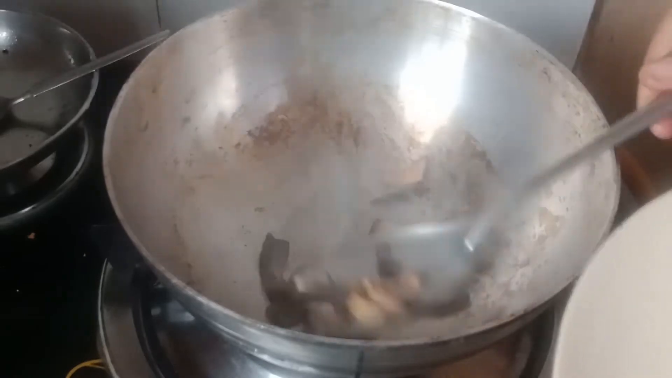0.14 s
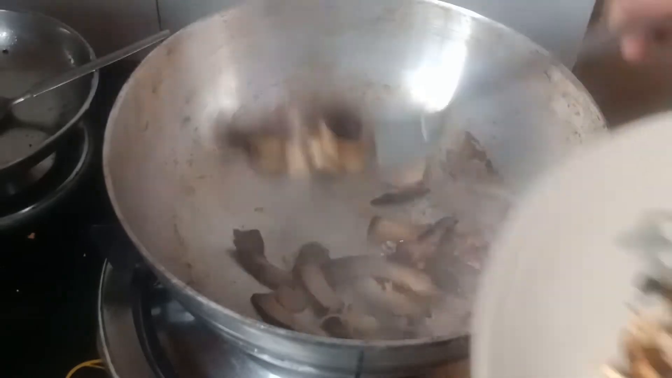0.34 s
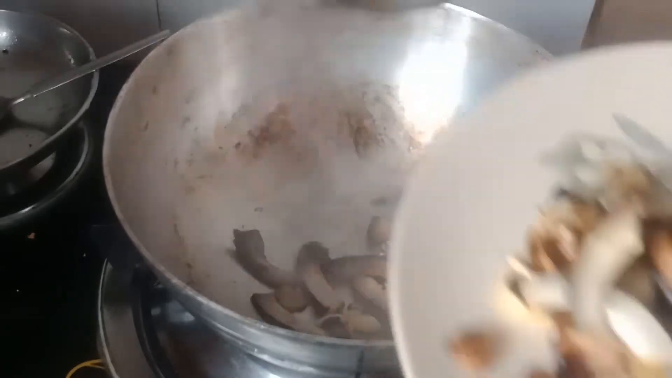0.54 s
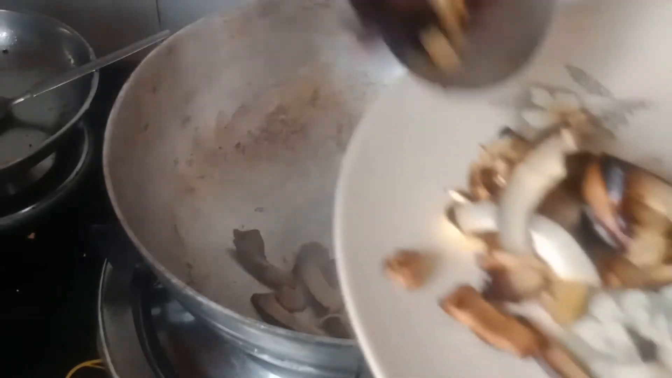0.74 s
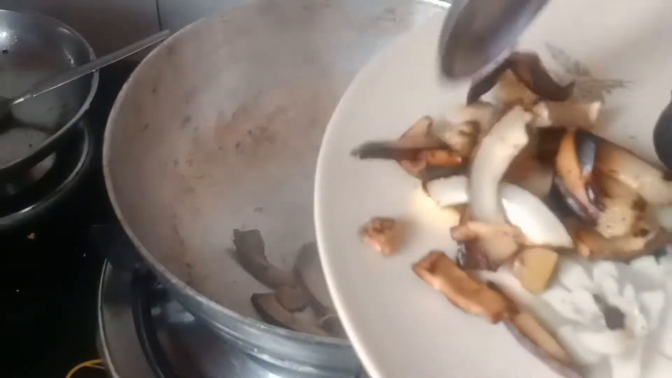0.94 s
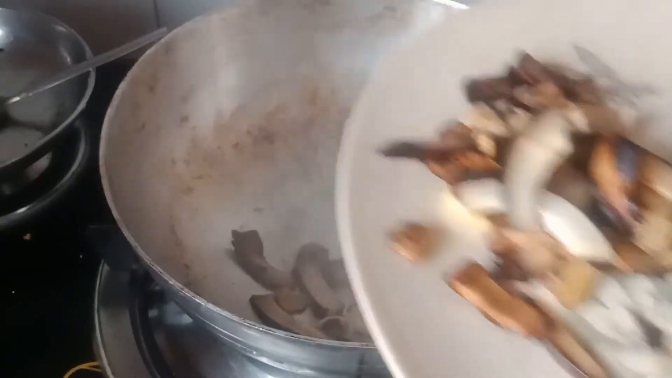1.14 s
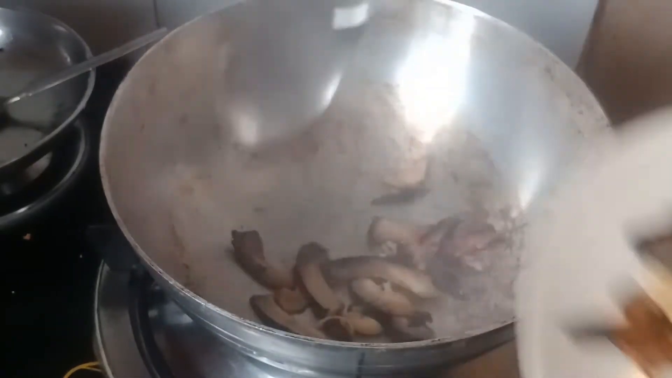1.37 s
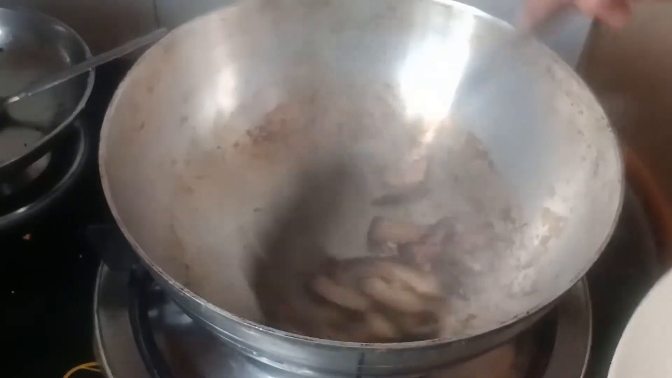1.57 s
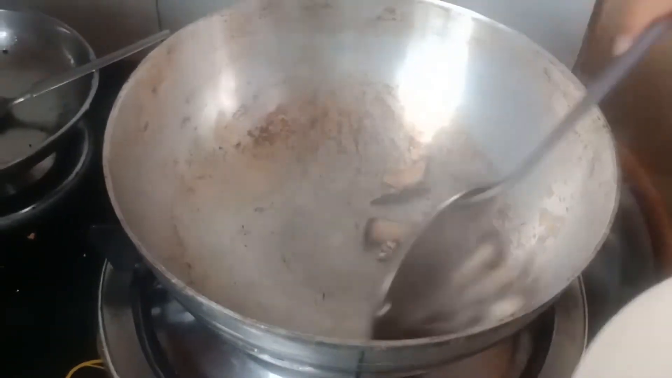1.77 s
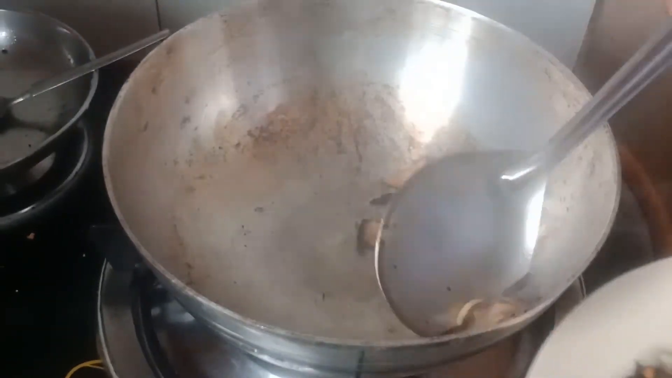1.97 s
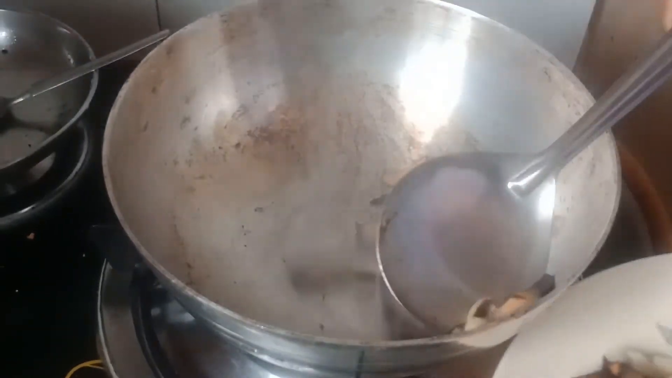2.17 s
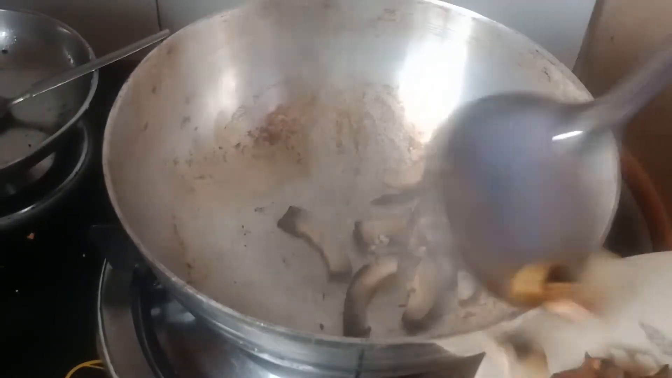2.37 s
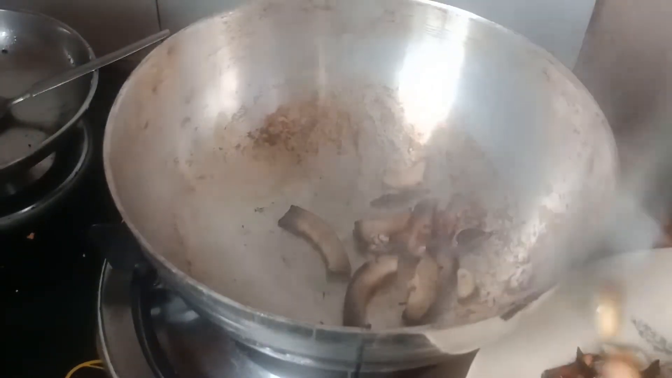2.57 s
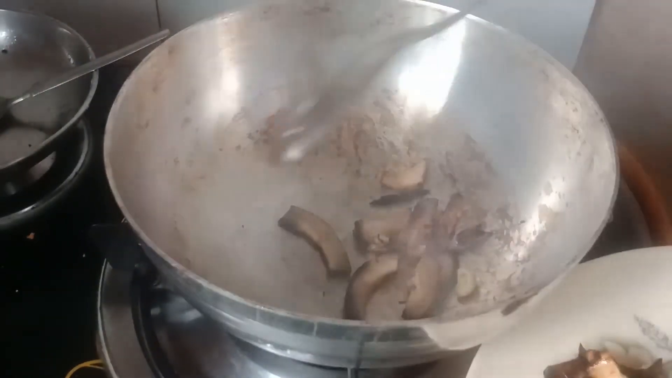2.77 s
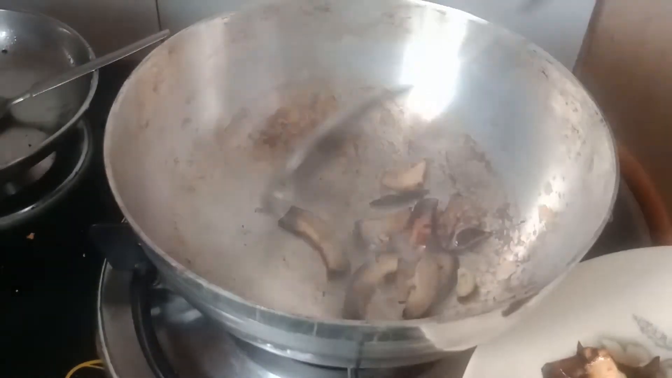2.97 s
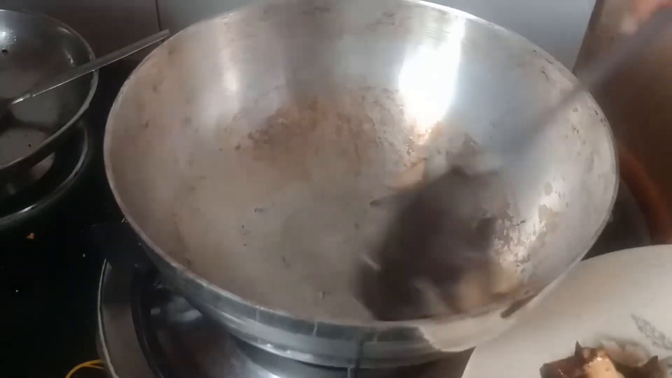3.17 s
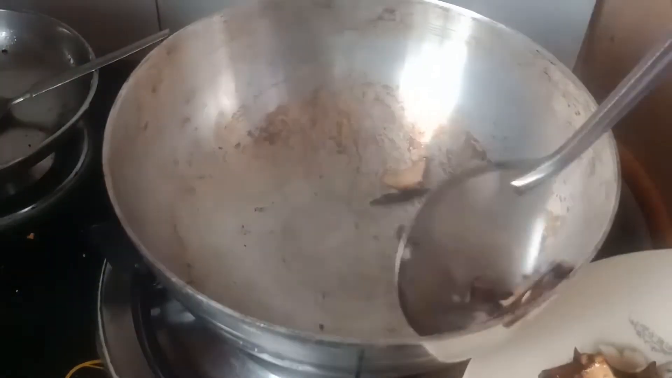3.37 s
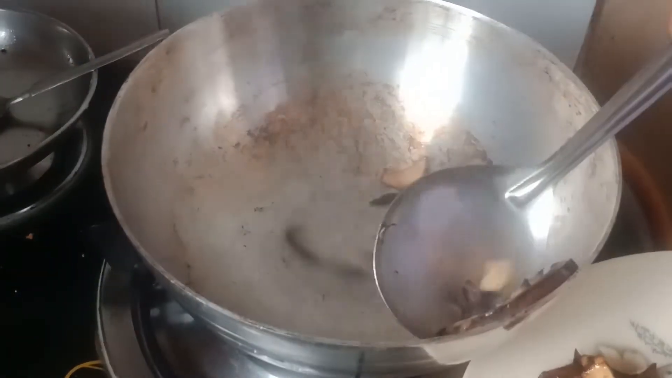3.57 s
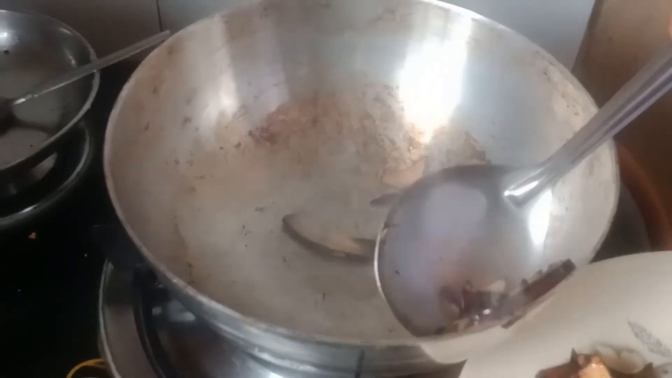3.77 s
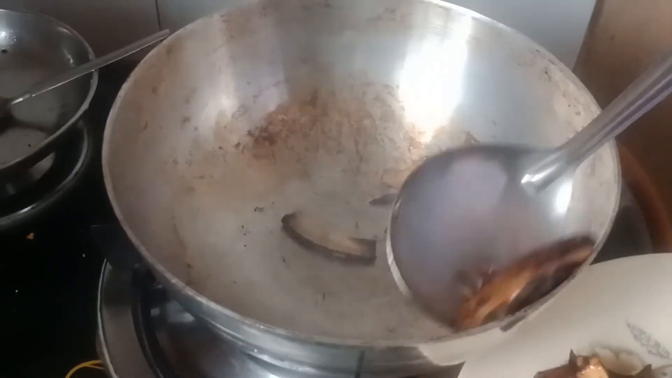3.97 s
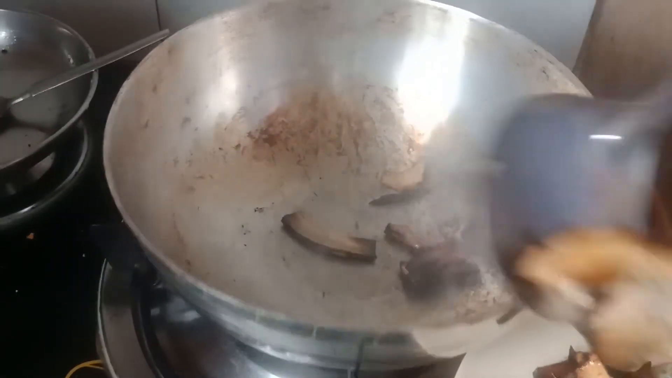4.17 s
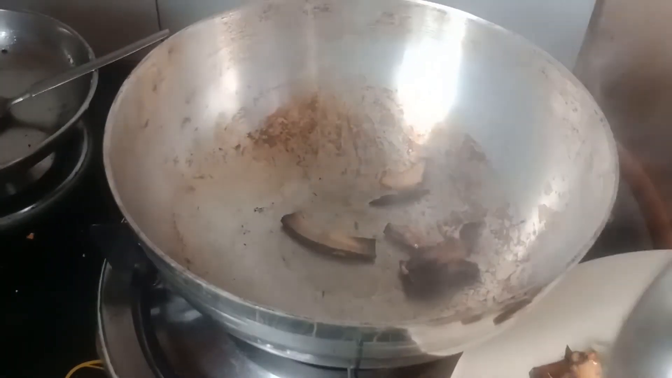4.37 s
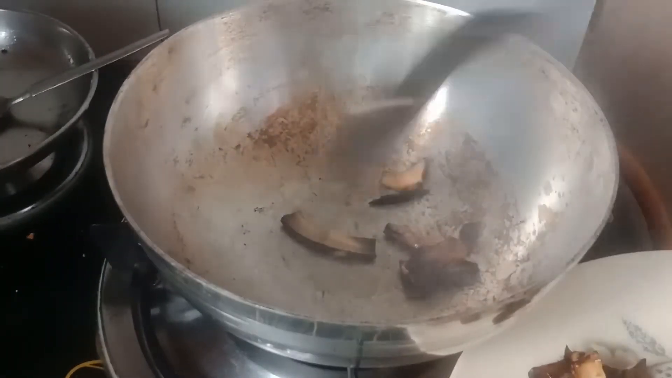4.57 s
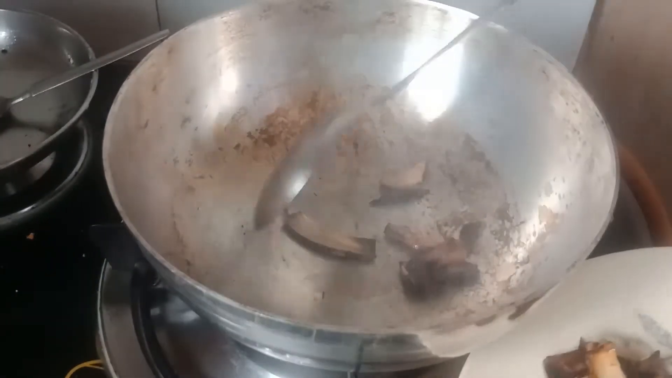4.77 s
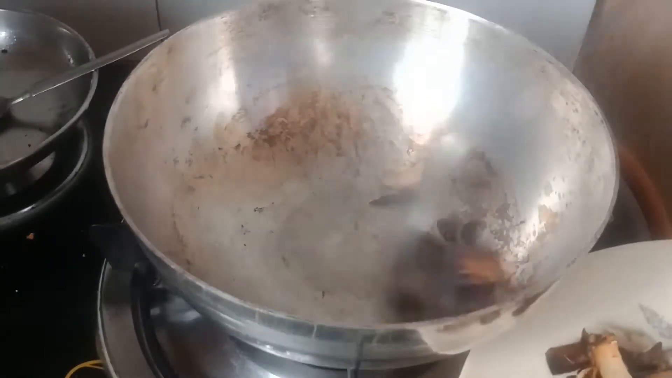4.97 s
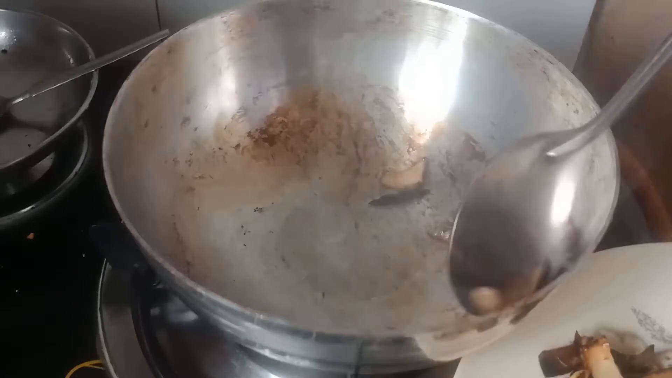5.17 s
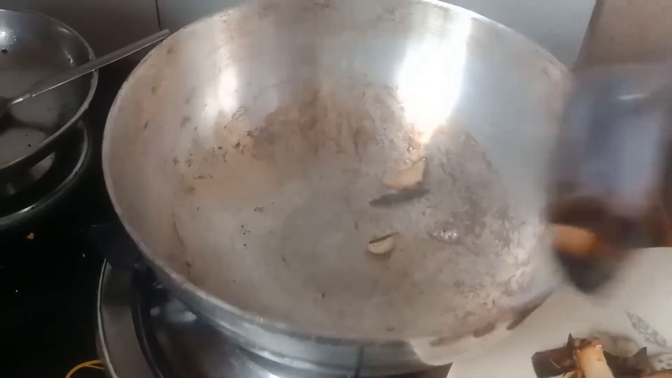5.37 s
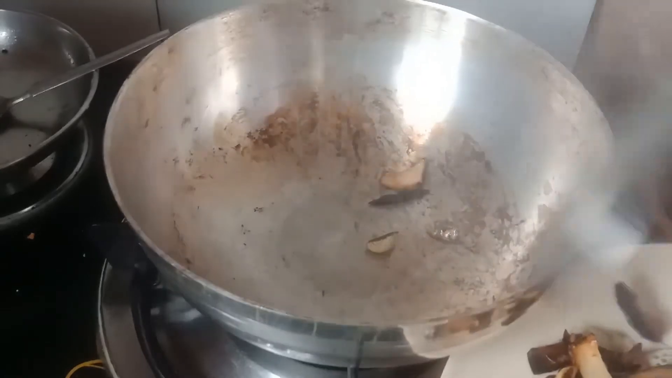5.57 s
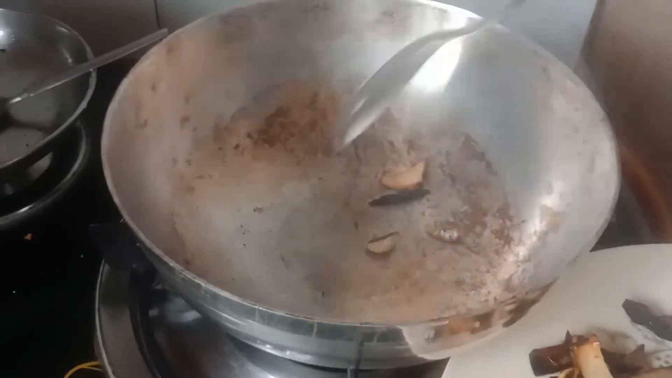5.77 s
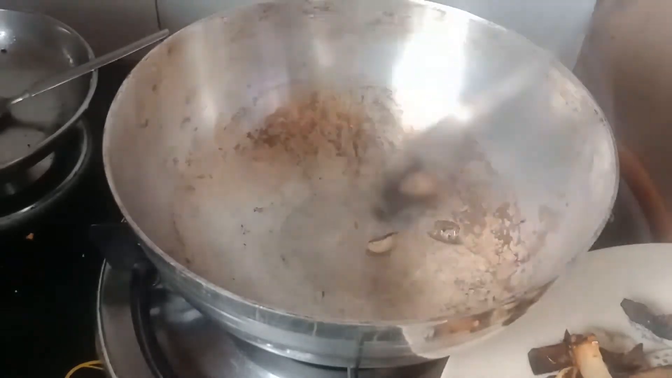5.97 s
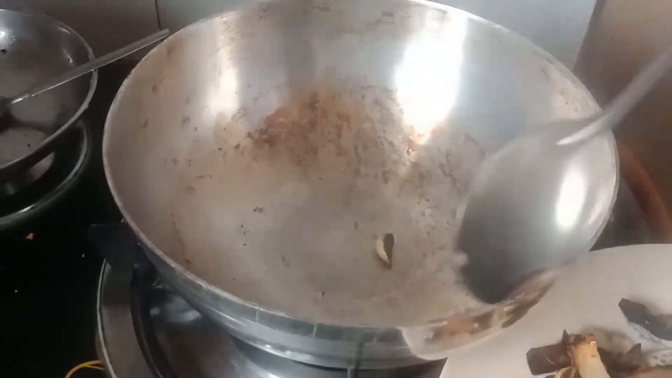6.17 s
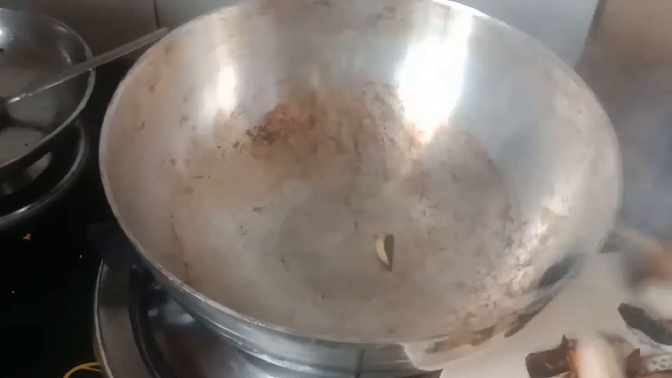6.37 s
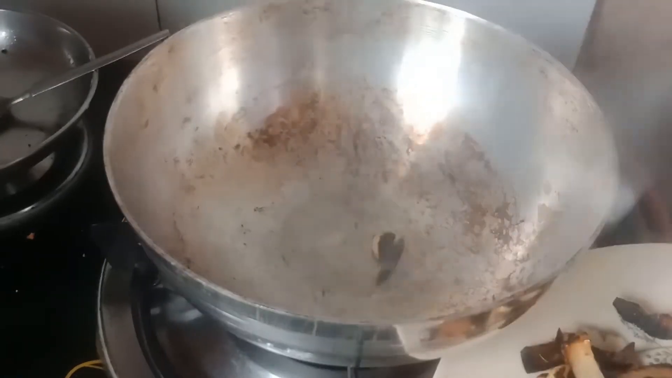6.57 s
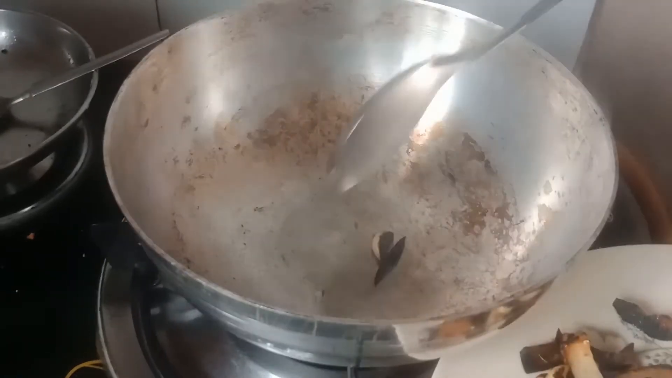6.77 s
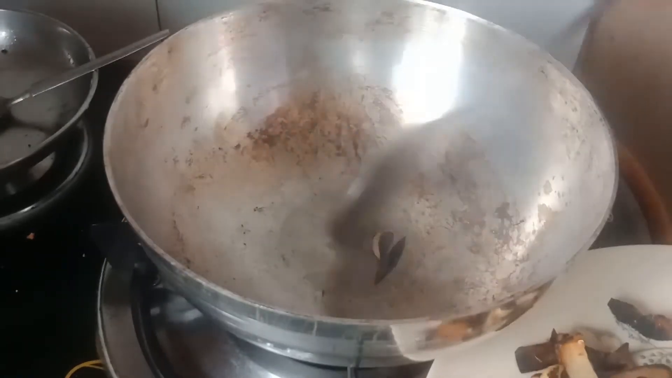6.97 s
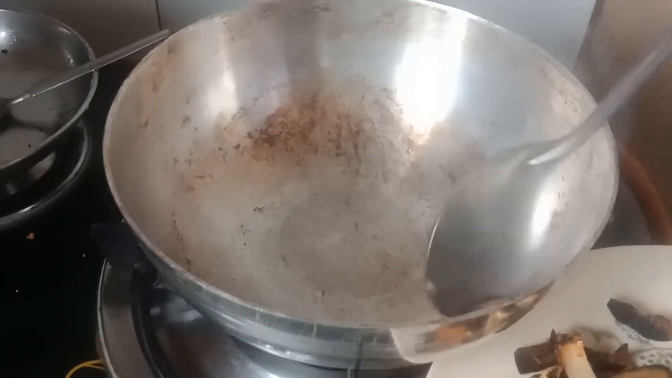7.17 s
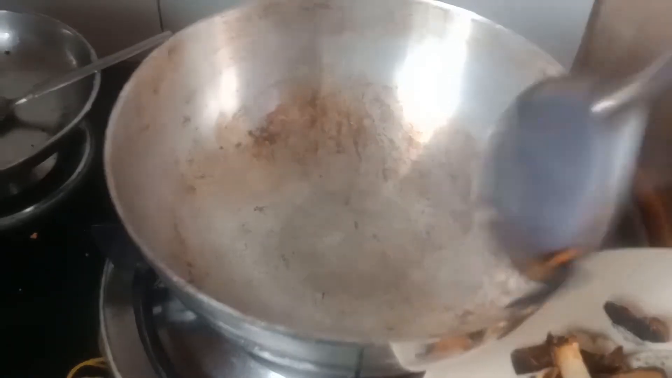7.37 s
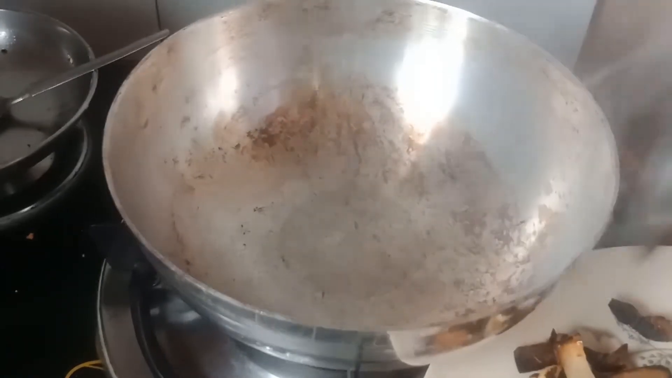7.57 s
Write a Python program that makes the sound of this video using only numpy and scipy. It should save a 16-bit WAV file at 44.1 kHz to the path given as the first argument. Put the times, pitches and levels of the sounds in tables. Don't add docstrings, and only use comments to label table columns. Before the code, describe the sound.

Close up in a small quiet kitchen, a steel spatula scrapes a thin round-bottomed pan. After a faint start and a near-quiet second come a short scrape, then longer, louder strokes, each landing with a sharp clank and bright ping and juddering up the wall with a rising rasp. Between strokes are knocks on rim and plate and dull pan thumps. A low appliance hum lies behind, with a short dull room echo.

```python
import sys
import numpy as np
from scipy import signal
from scipy.fft import rfft, irfft, next_fast_len
from scipy.io import wavfile
from scipy.ndimage import uniform_filter1d

SR = 44100
rng = np.random.default_rng(int(sys.argv[2]) if len(sys.argv) > 2 else 0)


def level_to_linear(level):
    exponent = np.asarray(level, float) / 20
    return 10 ** exponent


def persist_wave(psi):
    counts = np.round(np.clip(psi, -1, 1) * 32767).astype(np.int16)
    wavfile.write(sys.argv[1], SR, np.atleast_2d(counts).T)


N = 336914
SIDES = np.array([[1], [-1]])


def rms_one(x):
    return x / np.sqrt(np.mean(x ** 2) + 1e-20)


def at_hz(points, hz):
    pitch, level = np.array(points)[:, 0], np.array(points)[:, 1]
    return np.interp(np.log(np.maximum(hz, 1)), np.log(pitch), level)


def drift(rate):
    r = np.exp(-80 * np.pi * rate / SR)
    noise = rng.standard_normal(N // 40 + 2002)
    slow = signal.lfilter([1], [1, -2 * r, r * r], noise)[2000:]
    return np.interp(np.arange(N) / 40, np.arange(len(slow)), rms_one(slow))


# (pitch [Hz], level per Hz [dB])
HUM = [(12, -38.5), (20, -8.5), (27, -30), (59, -15), (101, -1), (308, -12.5), (335, -7), (510, -15.5),
       (693, -10), (1250, -17.5), (1950, -19), (2650, -19), (3800, -22), (7030, -33.5), (15800, -36.5)]
# (pitch [Hz], side minus middle [dB])
HUM_SIDE = [(60, -14), (200, -8.5), (700, -4), (1500, -1), (15000, 0.5)]


def hum():
    size = next_fast_len(N)
    hz = np.arange(size // 2 + 1) * SR / size
    width = np.array([np.ones(len(hz)), level_to_linear(at_hz(HUM_SIDE, hz))])
    noise = rfft(rng.standard_normal((2, size)))
    mid, side = irfft(noise * level_to_linear(at_hz(HUM, hz)) * width, size)[:, :N]
    level = level_to_linear(-62) * level_to_linear(.8 * drift(3)) / np.std(mid)
    return level * np.array([mid + side, mid - side])


def kitchen(x):
    t60_s, level_db, cut_hz = 0.25, -10.5, 8200
    t = np.arange(SR // 2) / SR
    noise = rng.standard_normal((2, len(t)))
    bass = signal.butter(2, 500, fs=SR, output="sos")
    common = signal.sosfilt(bass, noise[0] - noise[1])
    tail = np.array([noise[0], noise[1] + common]) * level_to_linear(-60 * t / t60_s) * (t > .004)
    tail = signal.sosfilt(signal.butter(1, cut_hz, fs=SR, output="sos"), tail)
    tail = tail / np.sqrt(np.sum(tail ** 2) / 2)
    return level_to_linear(level_db) * signal.oaconvolve(x, tail, axes=1)[:, :N]


# (pitch [Hz], left minus right [dB])
LEAN = [(200, -2), (600, 2.5), (2000, 0), (5000, -2), (12000, -16)]
# (pitch [Hz], phase [rad])
PHASE_SPREAD = [(200, 0.15), (600, 0.29), (1500, 2.19), (5000, 1.94)]


def left_right(hz, chance, share):
    phase = share * SIDES * at_hz(PHASE_SPREAD, hz) * chance
    return level_to_linear(SIDES * at_hz(LEAN, hz) / 2) * np.exp(1j * phase)


def part(modes, band_hz):
    hz, width, db = np.transpose(modes)
    t = np.arange(SR // 8) / SR
    rings = np.exp(np.outer(2j * np.pi * hz - np.pi * np.abs(width), t))
    rings = rings * (1 - np.exp(-np.outer(hz, t) / 0.39))
    edges = np.clip(band_hz, 20, .45 * SR)
    radiates = signal.butter(3, edges, "band", fs=SR, output="sos")
    rings = signal.sosfilt(radiates, rings).astype(np.complex64)

    def touch(lead_hz, spot_db):
        chance = rng.standard_normal((3, len(hz)))
        lead_db = 7.0 * np.exp(-(np.log(hz / max(lead_hz, 1)) / 0.19) ** 2)
        level = level_to_linear(db + lead_db + spot_db * chance[0])
        strength = np.sqrt(np.abs(width)) * level * np.sign(chance[1])
        ways = left_right(hz, chance[2], share=.5)
        pair = ((strength * ways).astype(np.complex64) @ rings).imag
        return pair / np.sqrt(np.sum(pair ** 2) / 2)
    return touch


# (pitch [Hz], level per Hz [dB])
SHEET = [(88, -49), (150, -9.5), (290, -19), (948, -13.5), (1240, -16.5), (1600, -14.5), (3160, -10.5),
         (3910, -27), (5030, -24.5), (15500, -47)]


def crowd(low_hz, high_hz, width_hz, level_db, count):
    hz = low_hz * (high_hz / low_hz) ** rng.random(count)
    db = at_hz(SHEET, hz) + 10 * np.log10(hz)
    return list(zip(hz, np.full(count, width_hz), db - db.max() + level_db))


# (pitch [Hz], width [Hz], level [dB])
BOWL = [(45, 44, -43), (93, 23, -13.5), (189.3, 11, -8.5), (242.8, 11, -2.5), (286.4, 6.5, 0.5),
        (380, 21.7, 2.5), (455, 20, 4.5)]
WALL = [(562.4, 54, 9.5), (609.4, 13, -9), (650, 20, 1.5), (754.4, 34, -2), (875.7, 39, 0), (950, 91, 4.5),
        (1010, 160, -7.5)]
RIM = [(1320, 87, 8), (1453, 51, 1.5), (1599, 84, 7.5), (1720, 44, -9.5), (1869, 10, -2.5), (2057, 60, 6),
       (2228, 8.1, -5.5), (2437, 29, 0.5), (2600, 54, -42.5), (2752, 180, 10)]
BLADE = [(3025, 130, 6.5), (3090, 52, 1), (3171, 41, 9.5), (3350, 22, -37.5), (3330, 12, -25)]
EDGE = [(4920, 42, 0.5), (5680, 34, -6), (6403, 48, -5.5), (6824, 71, -6.5), (7910, 28, -14.5),
        (8460, 91, -16), (8970, 44, -27.5), (9500, 64, -20.5), (9770, 50, -19.5), (10300, 56, -22),
        (11500, 45, -29), (12300, 45, -29.5), (12600, 120, -28), (14700, 40, -28), (13700, 45, -30),
        (14410, 150, -29), (14900, 57, -24)]
# (lowest [Hz], highest [Hz])
PART_BANDS = [(75, 810), (485, 1540), (1354, 2590), (3510, 5510), (2670, 3490), (4470, 24000)]


def parts():
    bowl = BOWL + crowd(160, 500, 26, -26.0, count=6)
    wall = WALL + crowd(504.0, 1243.0, 45, -3.5, count=30)
    rim = RIM + crowd(1202, 3185, 96, -2.1, count=60)
    crust = crowd(3194, 4800, 120, 0, count=30)
    blade = BLADE + crowd(2750, 3500, 38, -1.5, count=16)
    edge = EDGE + crowd(4756, 7434, 120, -11.5, count=45)
    edge = edge + crowd(7600, 11000, 25, -27.5, count=16) + crowd(11000, 15000, 60, -36, count=26)
    return [part(m, band) for m, band in zip([bowl, wall, rim, crust, blade, edge], PART_BANDS)]


# (pitch [Hz], width [Hz], level [dB])
SNAP = [(1520, 720, 15.5), (2296, 310, 1), (3104, 3200, -8.5)]


def snap(low_hz):
    t = np.arange(400) / SR
    cycles = np.zeros(len(t))
    for hz, width, db in SNAP:
        cycles += level_to_linear(db) * np.exp(-np.pi * width * t) * np.sin(2 * np.pi * hz * t)
    cycles = signal.sosfilt(signal.butter(3, [low_hz, 4300], "band", fs=SR, output="sos"), cycles)
    return cycles / np.abs(cycles).max()


# (middle [s], half length [s], level [dB], pitch [Hz])
NOTES = [(.05, 0.068, -45.5, 455), (0.038, 0.057, -60, 1387), (1.635, 0.022, -37, 3140),
         (1.655, 0.046, -41, 1996), (1.75, 0.013, -36.5, 3150), (1.699, 0.08, -47, 4920),
         (2.501, 0.075, -55, 364), (2.811, 0.05, -64, 950), (2.85, 0.027, -63, 3170),
         (3.07, 0.021, -46, 3160), (3.016, 0.0052, -28.5, 4920), (3.13, 0.054, -35.5, 3150),
         (3.193, 0.045, -30, 2740), (3.241, 0.02, -22.5, 3310), (3.29, 0.024, -28.5, 3200),
         (3.15, 0.055, -31, 870), (3.202, 0.058, -31.5, 294), (3.34, 0.056, -32, 242),
         (3.36, 0.061, -38, 289), (3.388, 0.03, -26.5, 380), (3.468, 0.023, -31, 380),
         (3.551, 0.04, -40, 386), (3.44, 0.13, -35, 1612), (3.981, 0.027, -51.5, 1594),
         (4.09, 0.1, -38, 380), (4.965, .02, -40, 4920), (5.06, 0.039, -26.5, 3193),
         (5.046, 0.045, -29, 2107), (5.13, 0.052, -30.5, 2053), (5.02, 0.059, -35.5, 2720),
         (5.136, 0.061, -32.5, 1625), (5.19, 0.034, -30, 380), (5.268, 0.024, -29.5, 380),
         (5.358, 0.011, -33.5, 380), (5.442, 0.023, -36, 380), (5.99, 0.036, -57, 3150),
         (6.11, 0.075, -40, 3133), (6.16, 0.036, -35, 1627), (6.246, 0.053, -28, 1620),
         (6.244, 0.041, -22, 375), (6.333, 0.058, -37, 379.5), (6.272, 0.059, -31.5, 2058),
         (7.1, 0.043, -44.5, 3250), (7.17, 0.021, -35, 3180), (7.25, 0.084, -33, 1612),
         (7.264, 0.063, -30, 382.4), (7.381, 0.071, -33, 381), (7.396, 0.034, -33, 2092),
         (7.479, 0.054, -37.5, 385)]
# (middle [s], half length [s], level [dB], pitch [Hz])
RASPS = [(1.79, 0.034, -30.5, 800), (1.8, 0.023, -33.5, 1300), (1.62, 0.049, -46, 747),
         (1.9, 0.042, -48, 1910), (3.48, 0.032, -30, 2600), (3.22, 0.086, -31.5, 2000),
         (3.3, 0.064, -44, 5900), (4.05, 0.074, -44, 1203), (4.06, 0.024, -53, 2496),
         (4.12, .03, -48.5, 3890), (4.18, 0.011, -57, 4460), (5.25, 0.019, -24, 2600),
         (6.25, 0.066, -33, 289.8), (6.27, 0.045, -29, 3000), (6.33, 0.027, -37.5, 2482),
         (7.05, 0.064, -33, 2085), (7.33, 0.061, -28, 2600), (7.4, 0.043, -42, 3700),
         (7.44, 0.026, -43, 4470), (.75, 0.33, -73, 1100), (3.4, 0.033, -61, 5000), (5.1, 0.044, -52, 4030),
         (1.65, .05, -52, 3980)]


def rubbed(rows, rough, width_share, count):
    out = np.zeros((2, N + 2 * SR))
    span = np.arange(-SR // 4, SR // 4) / SR
    chance = rng.standard_normal((len(rows), 2, count))
    for (middle, half, db, hz), (a, b) in zip(rows, chance):
        steps = (span - span[0]) * (width_share * hz * 2 + 24)
        grit = rough * (hz / 1000) ** .4
        wander = np.interp(steps, np.arange(count), a + 1j * b)
        uneven = (1 + grit * wander) / max(grit, 1)
        ways = left_right(hz, a[-1], share=.25)
        tone = (ways * uneven * np.exp(2j * np.pi * hz * span)).imag
        start = SR + round((middle + span[0]) * SR)
        out[:, start:start + len(span)] += level_to_linear(db + 3 - 6 * abs(span / half) ** 3) * tone
    for landing, *_ in SLIDES:
        out[:, SR + round((landing - .1) * SR):SR + round(landing * SR)] = 0
    return out[:, SR:SR + N]


# (time [s], peak level [dB], hiss level [dB])
CRACKS = [(1.5865, -31, -39), (3.0082, -13.5, -36), (3.0544, -20, -56), (3.1742, -19, -51.5),
          (4.238, -50, -59), (4.8712, -15.5, -43.5), (5.197, -30, -35.5), (5.4129, -18, -32.5),
          (5.528, -33, -62.5), (5.635, -24, -60), (5.9502, -7.5, -31), (6.1193, -19, -62),
          (6.9929, -24, -52.5)]


def cracks():
    hiss_s, hiss_hz = 0.0064, 7500
    out, t = np.zeros((2, N)), np.arange(SR // 8) / SR
    shape = -snap(low_hz=600)
    high = signal.butter(3, hiss_hz, "high", fs=SR, output="sos")
    quieter_left = np.array([[12.0], [0]])
    for s, db, hiss_db in CRACKS:
        start = round(s * SR)
        out[:, start:start + len(shape)] += level_to_linear(db) * shape
        noise = rng.standard_normal((2, len(t))) * np.exp(-t / hiss_s)
        out[:, start:start + len(t)] += level_to_linear(hiss_db - quieter_left) * signal.sosfilt(high, noise)
    return out


# (time [s], peak level [dB])
JUDDERS = [(1.7806, -25), (1.7845, -16), (1.788, -25), (1.7926, -16), (1.7955, -23), (1.797, -20),
           (1.809, -20), (1.8174, -25), (3.447, -22), (3.4585, -13.5), (3.4612, -11), (3.47, -17),
           (3.4775, -18), (3.483, -16), (3.488, -17), (3.4902, -7), (3.499, -11), (3.5027, -20),
           (5.226, -16), (5.2316, -14), (5.2354, -8), (5.2454, -17), (5.249, -22), (5.257, -11),
           (5.263, -15.5), (6.189, -6.5), (6.197, -4.5), (6.207, -9), (6.2158, -8), (6.2233, -15),
           (6.23, -14), (6.2383, -7), (6.246, -8), (6.253, 0), (6.256, -12.5), (6.259, -10), (6.2637, -5),
           (6.272, -11), (6.2774, -12.5), (6.282, -17), (6.2892, -18), (6.293, -5), (6.2994, -7.5),
           (7.224, -14), (7.276, -13), (7.283, -13), (7.2895, -6.5), (7.2955, -10), (7.299, -19),
           (7.3217, -14), (7.324, -19), (7.331, -16), (7.3337, -15), (7.3395, -17), (7.344, -11),
           (7.3548, -15), (7.364, -21), (7.369, -22), (7.385, -20), (7.389, -22)]


def judders():
    s, db = np.transpose(JUDDERS)
    clicks = np.zeros(N)
    clicks[np.round(s * SR).astype(int)] = level_to_linear(db - 2)
    left = np.convolve(clicks, snap(low_hz=1594))[:N]
    return np.array([left, np.roll(left, 5)])


# (strongest [s], rise [s], fall [s], level [dB], height [0-1])
CLIMBS = [(1.789, 0.038, 0.053, -22.5, 0.06), (3.208, 0.044, 0.029, -26.5, 0.48),
          (3.38, 0.1, 0.024, -27, 0), (3.487, 0.11, 0.058, -23, 0.35), (4.024, 0.054, 0.22, -36.5, 0.37),
          (4.12, 0.064, 0.032, -35.5, 0.96), (4.176, 0.019, 0.013, -32, 1.04),
          (5.031, 0.076, 0.047, -33, 0.6), (5.14, 0.047, 0.025, -20.5, 0.49),
          (5.239, 0.026, 0.035, -19.5, 0.48), (6.247, 0.077, 0.025, -18.5, 0.57),
          (6.299, 0.056, 0.048, -26.5, 0.96), (7.051, 0.016, 0.039, -32, 0.91),
          (7.249, 0.092, 0.025, -25, 0.2), (7.322, 0.076, 0.12, -26, 0.35), (7.409, 0.14, 0.062, -29.5, 1)]


def chatter(per_s, jitter, size_db, level_db):
    gaps, t = rng.standard_normal((2000, 2)), np.arange(N) / SR
    at = (np.cumsum(np.exp(jitter * gaps[:, 0])) * SR / per_s).astype(int)
    clicks, left = np.zeros(N), np.zeros(N)
    clicks[at[at < N]] = level_to_linear(size_db * gaps[at < N, 1])
    for top, rise, fall, db, height in CLIMBS:
        span = slice(round((top - .25) * SR), round((top + .25) * SR))
        away = np.where(t[span] < top, (top - t[span]) / rise, (t[span] - top) / fall)
        shape = snap(low_hz=500 + 1800 * np.clip(height, 0, 1))
        shape = shape / np.sqrt(np.sum(shape ** 2) * per_s / SR)
        left[span] += np.convolve(clicks[span] * level_to_linear(db - 17.0 * away ** 1.2), shape)[:len(away)]
    return level_to_linear(level_db) * np.array([left, np.roll(left, 5)])


# (time [s], peak level [dB])
PINGS = [(1.727, -26), (3.0092, -14), (3.0535, -11.5), (3.174, -9.5), (3.21, -12), (3.236, -17),
         (4.8722, -8.5), (5.052, -12.5), (5.9501, -17.5), (6.062, -20), (6.9928, -8.5), (7.022, -19)]


def pings(bodies):
    out, t = np.zeros((2, N + SR)), np.arange(SR // 8) / SR
    hz, decay_s = 3150, 0.012
    clean = -level_to_linear(-2.5) * np.sin(2 * np.pi * hz * t) * np.exp(-t / decay_s) * np.minimum(t * hz, 1)
    clean = np.array([clean, np.roll(clean, 3)])
    for s, db in PINGS:
        ring = bodies[4](3160, spot_db=2.5) + level_to_linear(-23.5) * bodies[5](4900, spot_db=2.5)
        start = round(s * SR)
        out[:, start:start + len(t)] += level_to_linear(db) * (level_to_linear(-3.5) * ring / np.abs(ring).max() + clean)
    return out[:, :N]


# (time [s], peak level [dB])
SKIPS = [(1.5872, -15.5), (1.616, -19), (3.0081, -11), (4.2895, -24), (4.8717, -14.5), (5.9501, -5),
         (6.9929, -18), (6.028, -11.5), (6.045, -12.5), (6.061, -16), (6.1195, -13), (6.15, -11),
         (6.162, -11), (6.197, -16.5), (6.178, -13), (4.238, -48), (4.391, -27.5), (2.731, -38),
         (3.086, -16), (3.047, -21.5), (5.712, -47), (5.796, -40.5)]


def skips(bodies, leading_hz):
    out, t = np.zeros((2, N + SR)), np.arange(SR // 8) / SR
    dent = level_to_linear(-1) * np.sin(2 * np.pi * 850 * t) + level_to_linear(-9) * np.sin(2 * np.pi * 1697 * t)
    dent = -dent * np.exp(-t / 0.0024)
    dent = signal.sosfilt(signal.butter(2, [350, 4000], "band", fs=SR, output="sos"), dent)
    for s, db in SKIPS:
        ring = bodies[1](800, spot_db=3.5) + level_to_linear(-12.5) * bodies[2](leading_hz(s)[2], spot_db=3.5)
        ring = ring * np.exp(-t / .004)
        start = round(s * SR)
        out[:, start:start + len(t)] += level_to_linear(db) * (level_to_linear(-4.5) * ring / np.abs(ring).max() + dent)
    return out[:, :N]


# (time [s], peak level [dB], blade level [dB])
KNOCKS = [(0.731, -43.5, -6.5), (0.923, -45, -23), (1.5871, -15.5, -8), (2.06, -38, -9.5), (2.115, -40, -7),
          (2.423, -29.5, -30), (2.828, -41, -7), (3.0079, -7, -22), (4.2815, -23.5, -9.5),
          (4.392, -18, -20), (4.459, -27, -19), (4.8715, -9.5, -3.5), (5.527, -25, -11),
          (5.734, -32.5, -42), (5.907, -33, -25.5), (5.9499, -13, -20), (6.572, -24, -11.5),
          (6.9927, -14.5, -5.5)]
# (time [s], peak level [dB], blade level [dB])
CATCHES = [(0.09, -20.5, -12), (1.088, -35.5, -16), (1.851, -32, -1), (2.599, -25.5, -16.5),
           (2.779, -34, -15), (3.047, -25, -18), (3.174, -3, -32), (4.172, -29.5, 5), (5.197, -22, 0.5),
           (3.44, -24.5, 2), (6.617, -25.5, -7.5), (5.4112, -8.5, -5), (5.635, -12.5, -14.5),
           (5.873, -35, -21)]
# (time [s], peak level [dB], blade level [dB])
THUMPS = [
    (1.012, -49, -20),
    (2.73, -49.5, -15),
    (4.238, -35.5, -29),
    (4.2892, -18, -21),
    (4.3005, -27.5, -6),
    (5.343, -31, -25),
    (5.552, -22, -29.5),
    (6.6063, -18, -33),
]


def blows(bodies, leading_hz):
    out, t = np.zeros((2, N + SR)), np.arange(SR // 8) / SR
    damping = (1 + 0.38 * np.exp(-t / 0.00098)) * np.exp(-t / 0.41)
    crack = -level_to_linear(-4.5) * snap(low_hz=445)
    thump_hz, thump_s = 542, 0.0038
    thump = -level_to_linear(6.5) * np.sin(2 * np.pi * thump_hz * t) * np.exp(-t / thump_s)
    thump = thump * np.minimum(t * thump_hz, 1)
    thump = signal.sosfilt(signal.butter(2, 220, "high", fs=SR, output="sos"), thump)
    # blows, thud [dB], rim [dB], first sound
    kinds = [(KNOCKS, -6.5, 0, crack), (CATCHES, -21, 0, crack), (THUMPS, 3, -7, thump)]
    for rows, thud_db, rim_db, first in kinds:
        for s, peak_db, blade_db in rows:
            rings = [touch(hz, spot_db=5.5) for touch, hz in zip(bodies, leading_hz(s + 0.0067))]
            bowl, wall, rim, crust, blade, edge = rings
            sound = level_to_linear(thud_db + 16.5) * (level_to_linear(-2) * bowl + wall) + level_to_linear(4.5 + rim_db) * rim
            sound = sound + level_to_linear(blade_db + 12.5) * (blade + level_to_linear(-1.0) * crust + level_to_linear(-6.5) * edge)
            start = round((s + 0.00021) * SR)
            out[:, start:start + len(t)] += level_to_linear(peak_db) * sound * damping
            out[:, start:start + len(first)] += level_to_linear(peak_db + min(thud_db, 0) / 2) * first
    return out[:, :N]


FADE_SPEED = [1.26, 0.9, 1.43, 1.2, 2.1, 1.08]
# (start [s], hold [s], level [dB], brightness [dB], wall pitch [Hz])
ROCKS = [(0, 0.04, -44, 13.5, 600), (0.07, 0.0064, -42.5, 7, 600), (0.534, 0.53, -66, 12, 750),
         (1.848, 0.12, -50, 12, 950), (2.423, 0.15, -48.5, 4, 910), (2.728, 0.039, -40.5, 2, 950),
         (2.823, 0.062, -39, -4, 950), (3.532, 0.017, -34, 3, 720), (4.291, 0.005, -22, 3.5, 540),
         (4.383, 0.013, -46.5, 15, 600), (5.311, 0.044, -29, 3, 546), (5.404, 0.0072, -40.5, 19.5, 550),
         (5.524, 0.02, -33.5, 5.5, 800), (5.548, 0.012, -21.5, 0, 555), (5.629, 0.013, -48, 12.5, 600),
         (5.701, 0.11, -56, 8, 650), (6.429, 0.029, -44, 7.5, 895), (6.569, 0.013, -46, 16, 700),
         (6.605, 0.059, -28.5, -2.5, 600)]
ROCK_MIX = [-4, -8.5, -16.5, -28, -23.5, -31.5]


def rocking(t, fade):
    for start, hold, db, bright_db, wall_hz in ROCKS:
        mix = np.add(ROCK_MIX, bright_db * (np.arange(6) >= 2))
        dying_db = 204 * fade * np.maximum(t - start - hold, 0)
        yield (t >= start) * level_to_linear(mix[:, None] + db - dying_db), [332, wall_hz, 1710]


# (strongest [s], half length [s], level [dB], pitch [Hz])
GROANS = [(0.025, 0.073, -44, 455), (1.635, 0.04, -26.5, 260), (1.862, 0.011, -34, 292),
          (2.578, 0.026, -67, 238), (2.746, 0.024, -41.5, 235), (3.33, 0.035, -41, 246),
          (3.406, 0.038, -28.5, 380), (3.549, 0.018, -24.5, 380), (4.077, 0.066, -35.5, 380),
          (4.252, 0.023, -37, 380), (5.176, 0.023, -25.5, 380), (5.357, 0.026, -43, 380),
          (5.433, 0.033, -29, 380), (5.551, 0.024, -25.5, 245), (5.747, 0.02, -45.5, 191),
          (6.13, 0.14, -29, 285), (6.236, 0.032, -23.5, 380), (6.272, 0.05, -26, 290),
          (6.47, 0.041, -40.5, 239), (7.263, 0.073, -37, 380), (7.388, 0.057, -26, 380),
          (7.475, 0.03, -35, 380)]


def groaning(t):
    bowl = (np.arange(6) == 0)[:, None]
    for top, half, db, hz in GROANS:
        yield level_to_linear(db - 4 - 9 * abs((t - top) / half) ** 1.5) * bowl, [hz, 0, 0]


# (strongest [s], half length [s], level [dB])
SINGS = [
    (1.64, 0.018, -32),
    (1.748, 0.014, -33.5),
    (3.09, 0.025, -30),
    (3.214, 0.02, -20),
    (4.953, 0.026, -21.5),
    (5.053, 0.055, -21),
    (6.067, 0.028, -42.5),
    (7.025, 0.014, -32),
    (7.289, 0.0095, -25),
]
FREE_TONES = [0, 3160, 4900]


def singing(t):
    blade = (np.arange(6) == 4)[:, None]
    for top, half, db in SINGS:
        yield level_to_linear(db - 9 * abs((t - top) / half) ** 1.5) * blade, [0, 0, 0, *FREE_TONES]


CLIMB_MIX_LOW = [-5.5, -3, -2.5, -28, -17, -23]
CLIMB_MIX_HIGH = [-11.5, -10, 1.5, -6.5, -1.5, -12.5]
CLIMB_LEAD_LOW = [300, 754, 1700]
CLIMB_LEAD_HIGH = [409, 915, 3210]


def climbing(t, fade):
    for top, rise, fall, db, height in CLIMBS:
        mix = np.add(CLIMB_MIX_LOW, height * np.subtract(CLIMB_MIX_HIGH, CLIMB_MIX_LOW))
        lead = np.add(CLIMB_LEAD_LOW, height * np.subtract(CLIMB_LEAD_HIGH, CLIMB_LEAD_LOW))
        away = np.where(t < top, (top - t) / rise, (t - top) / fall)
        yield level_to_linear(mix[:, None] + db - 9.24 * fade * away ** 1.6), lead


# (start [s], lift [s], first level [dB], last level [dB], blade freedom [dB])
SLIDES = [
    (1.59, 1.759, -34, -33.5, 1.5),
    (3.01, 3.334, -28, -26.5, 2),
    (4.877, 5.129, -31.5, -29, 7.5),
    (5.949, 6.17, -27.5, -32.5, -5.5),
    (6.994, 7.2, -36.5, -35, 5.5),
]
SLIDE_MIX = [-6, -0.5, -4, -13, -10, -12]
FREE_SHARE = [0.01, 0.011, 0.31, 0.75, 1.4, 0.39]
LANDING_MIX = [4.8, 6, 1.7, 4, 13, 17]
SLIDE_LEAD = [265, 759, 1880]


def sliding(t, fade):
    for start, lift, first_db, last_db, blade_db in SLIDES:
        landing = np.outer(LANDING_MIX, np.exp(-abs(t - start) / 0.0082))
        db = np.interp(t, [start, lift], [first_db, last_db]) + landing
        mix = np.add(SLIDE_MIX, blade_db * np.array(FREE_SHARE))
        lead = np.add(SLIDE_LEAD, [0, 0, 67 * min(blade_db, 0)])
        dying_db = 292 * fade * np.maximum(t - lift, 0)
        yield (t >= start) * level_to_linear(mix[:, None] + db - dying_db), [*lead, *FREE_TONES]


def contact():
    t, fade = np.arange(0, N + 32, 32) / SR, np.array(FADE_SPEED)[:, None]
    moves = [*sliding(t, fade), *climbing(t, fade), *rocking(t, fade), *groaning(t), *singing(t)]
    power, lead = 1e-30, 0
    for gain, hz in moves:
        power = power + gain ** 2
        lead = lead + gain ** 2 * np.pad(hz, (0, 6 - len(hz)))[:, None]
    lead = lead / power
    for landing, *_ in SLIDES:
        power[:, (t > landing - .03) & (t < landing)] *= .01
    gains = [np.interp(np.arange(N) / SR, t, row) for row in np.sqrt(power)]
    return np.array(gains), lambda s: [np.interp(s, t, row) for row in lead]


def slips(per_s, size_db, clump_db, grit):
    sizes = level_to_linear(size_db * np.minimum(rng.exponential(1, N), 2.5)) * rng.choice([-1, 1], N)
    born = rng.random(N) < per_s / SR
    force = rms_one(sizes * born) + grit * rng.standard_normal(N)
    force = force / uniform_filter1d(force ** 2, size=500) ** .35
    return rms_one(force * level_to_linear(clump_db * drift(25)))


def scrape(bodies, gains, leading_hz):
    force = slips(per_s=550, size_db=3.5, clump_db=1.15, grit=0.65)
    out = np.zeros((2, N + SR))
    hop = round(.1 * SR)
    for centre in range(0, N + hop, hop):
        at = np.arange(max(centre - hop, 0), min(centre + hop, N))
        window = np.cos(np.pi / 2 * (at - centre) / hop)
        push = force[at] * window
        loudest = at[np.argmax(abs(window) * gains[:, at].max(axis=0))]
        for gain, touch, hz in zip(gains, bodies, leading_hz(loudest / SR)):
            ring = touch(hz, spot_db=1.5)
            if gain[at].max() > 3e-5:
                sound = signal.fftconvolve((gain[at] * push)[None], ring, axes=1)
                out[:, at[0]:at[0] + sound.shape[1]] += sound
    return out[:, :N]


def scene():
    bodies, (gains, leading_hz) = parts(), contact()
    near = scrape(bodies, gains, leading_hz) + blows(bodies, leading_hz)
    near = near + pings(bodies) + skips(bodies, leading_hz)
    near = near + chatter(per_s=200, jitter=.3, size_db=-1.0, level_db=-4.0) + judders()
    heard = near + kitchen(near) + hum()
    heard = heard + rubbed(NOTES, rough=0.66, width_share=.016, count=400)
    heard = heard + rubbed(RASPS, rough=6, width_share=.13, count=900)
    return heard + cracks()


def low_pass(x):
    return signal.sosfilt(signal.butter(12, 15350, fs=SR, output="sos"), x)


def record(dry):
    mix = signal.sosfilt(signal.butter(16, 15100, fs=SR, output="sos"), dry)
    return low_pass(mix)


dry = scene()
out = record(dry)
persist_wave(out)
```